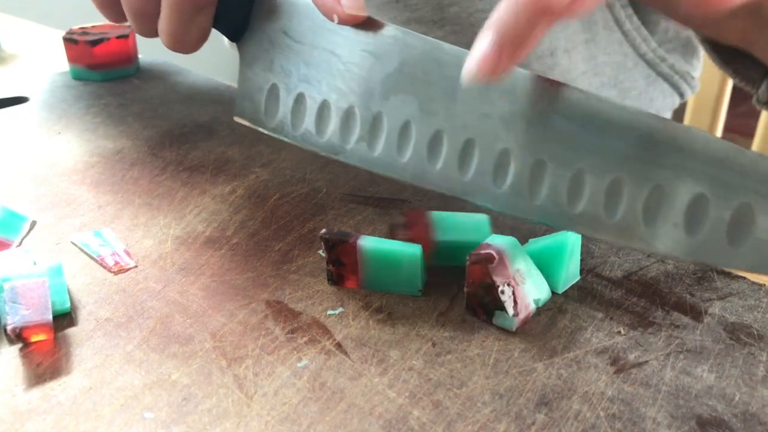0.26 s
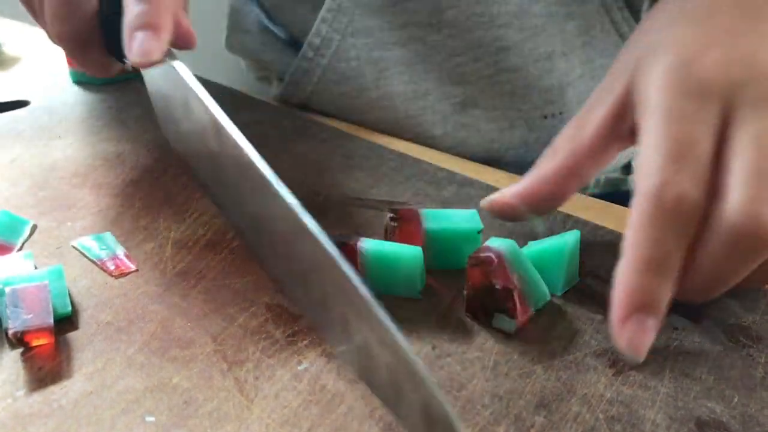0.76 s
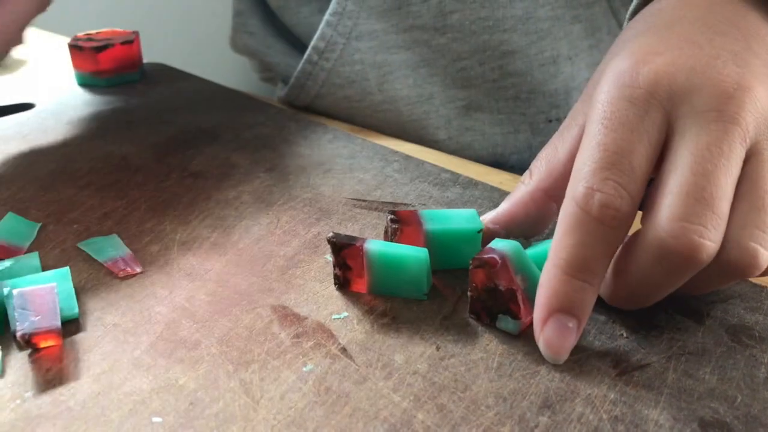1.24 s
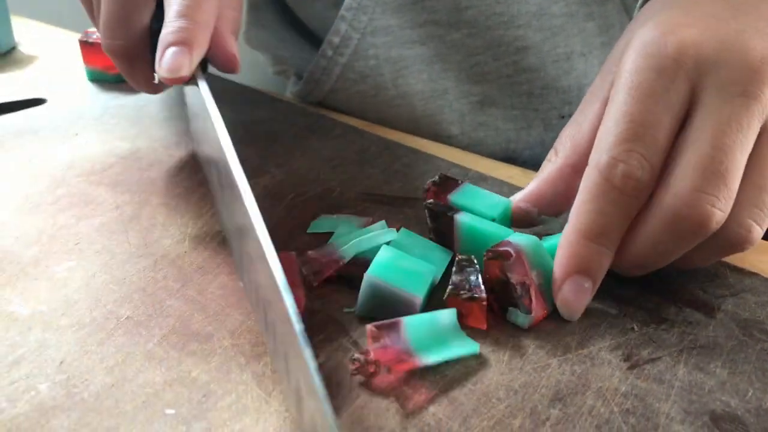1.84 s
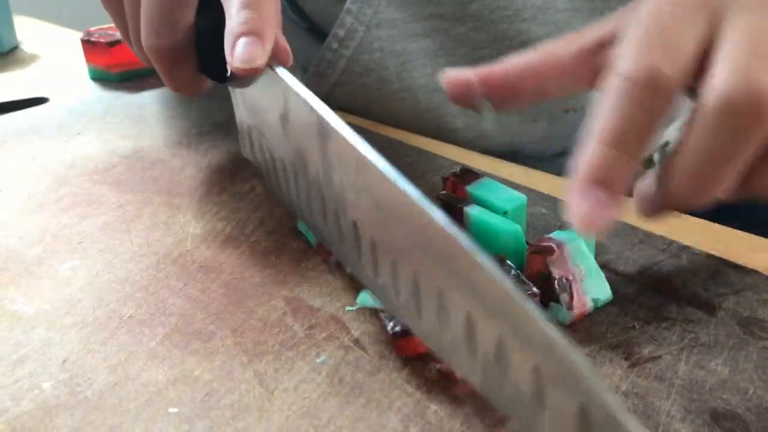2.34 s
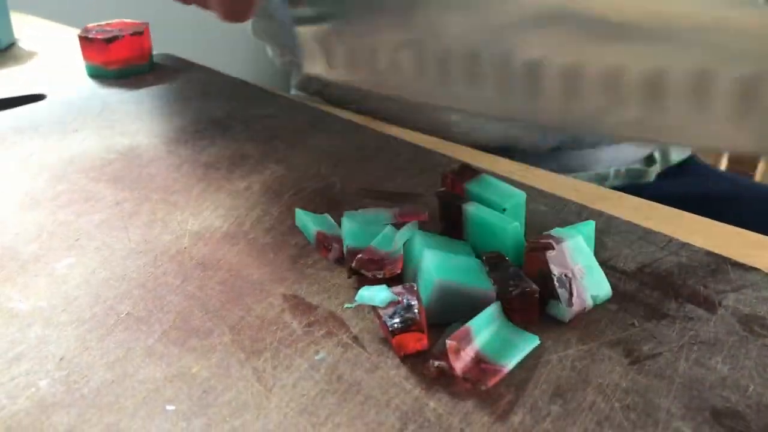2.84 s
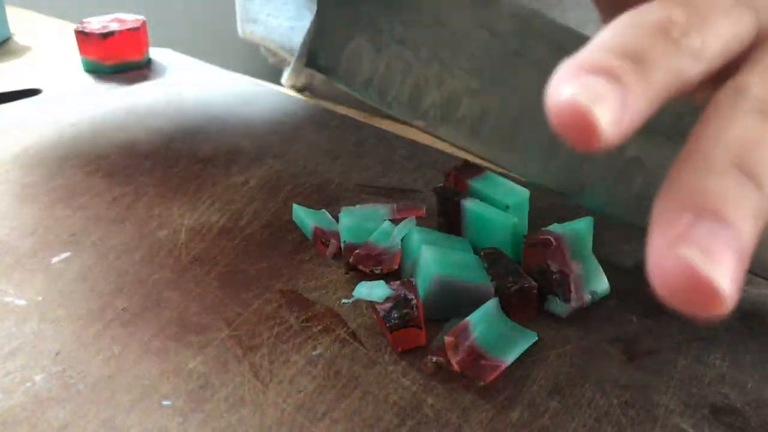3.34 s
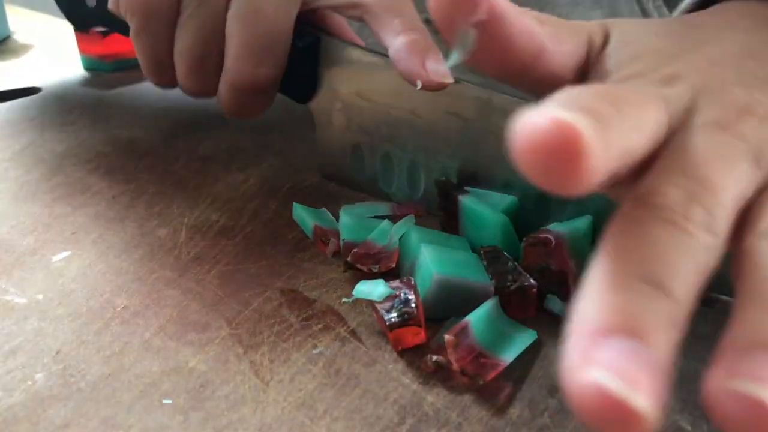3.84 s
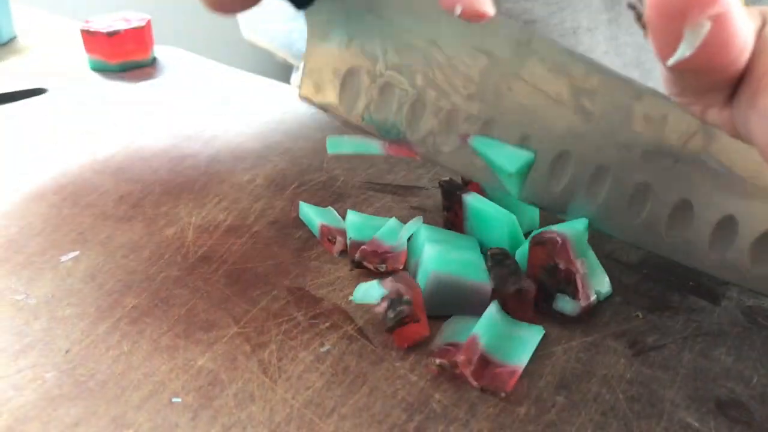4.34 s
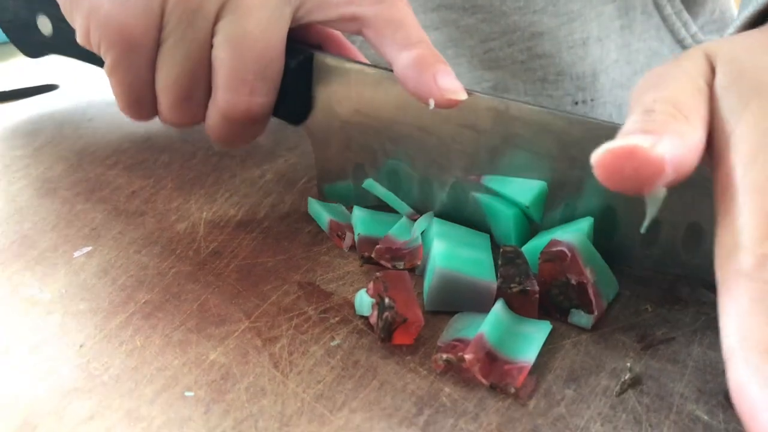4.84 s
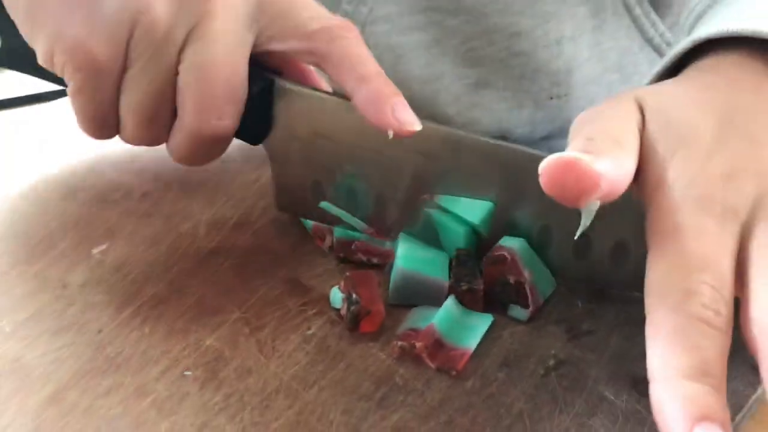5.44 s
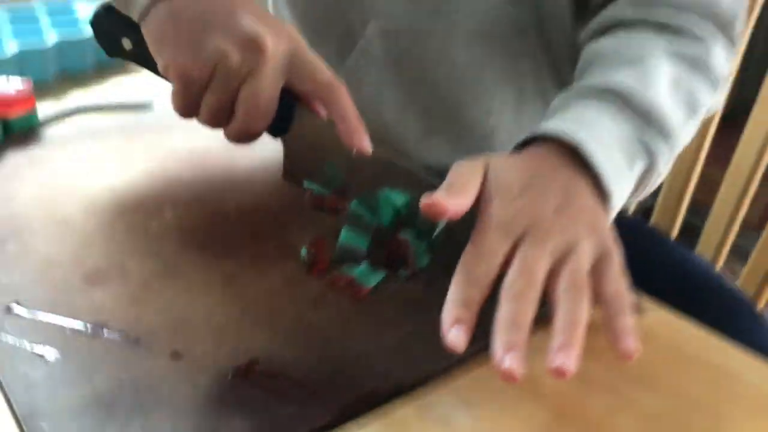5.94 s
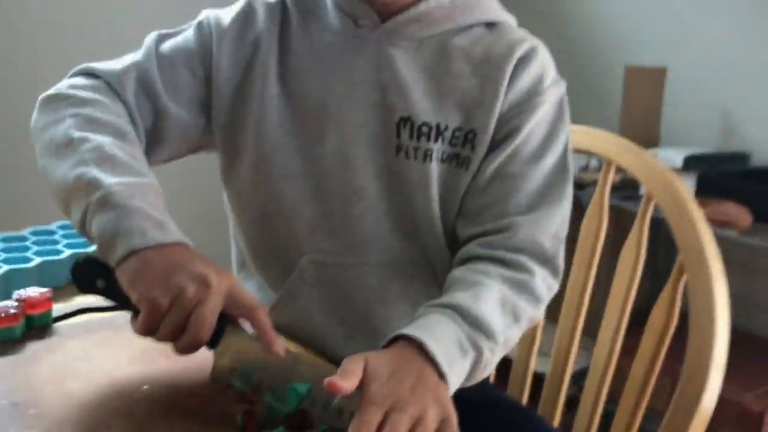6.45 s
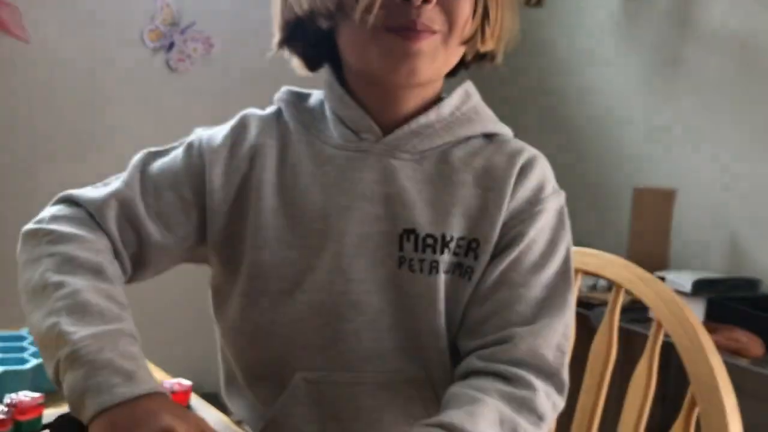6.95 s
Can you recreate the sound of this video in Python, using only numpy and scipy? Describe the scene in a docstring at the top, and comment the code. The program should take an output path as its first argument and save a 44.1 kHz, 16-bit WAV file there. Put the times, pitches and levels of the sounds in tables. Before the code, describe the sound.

Irregular knife chops crack through soap and knock on a wooden cutting board, between ringing blade scrapes and small ticks.

```python
"""Chopping soap on a wooden board

A large kitchen knife chops small blocks of soap on a board that lies on a table in a small room.
The blade breaks through with a crack and knocks the board into a woody ring. Tiny slips of the edge
rasp and make the steel ring as it scrapes the pieces across the board and slices them. Bits of soap
drop and hop, and the blade ticks and clicks, over soft sleeve brushes, handling bumps and room noise."""
import sys
import numpy as np
from scipy import signal
from scipy.fft import rfft, irfft, next_fast_len
from scipy.io import wavfile
from scipy.ndimage import uniform_filter1d, map_coordinates

SR = 44100
rng = np.random.default_rng(int(sys.argv[2]) if len(sys.argv) > 2 else 0)


def dump_mix(stems):
    """Bounce the given channels to the path in sys.argv[1] as a 16-bit WAV at rate SR."""
    frames = np.atleast_2d(stems).T  # one column per channel
    limited = np.clip(frames, -1, 1)  # hard clip at full scale
    pcm = np.round(limited * 32767).astype(np.int16)
    wavfile.write(sys.argv[1], SR, pcm)


N = 316986
TIME = np.arange(N) / SR
HIT_SIZE = 4096   # FFT size of one contact, in samples
FADE_DB = 30   # depth of a gesture's attack and release


def from_db(db):
    """Decibels to gain."""
    return 10 ** (np.asarray(db) / 20)


def rms_one(x):
    """Scale to unit rms."""
    return x / np.sqrt(np.mean(x ** 2) + 1e-20)


def bins(size):
    """Frequencies of a spectrum, kept above zero."""
    return np.maximum(np.fft.rfftfreq(size, 1 / SR), 1)


def at_hz(points, hz):
    """Read a curve on a log-frequency axis."""
    known, values = np.transpose(points)
    return np.interp(np.log(hz), np.log(known), values)


def coloured(x, spectrum):
    """Shape a steady sound with an EQ curve."""
    size = next_fast_len(len(x))
    return irfft(rfft(x, size) * from_db(at_hz(spectrum, bins(size))), size)[:len(x)]


def add(track, s, sound):
    """Mix a sound in at s seconds."""
    start = max(round(s * SR), 0)
    track[start:start + len(sound)] += sound[:max(N - start, 0)]


def swell(s, length_s):
    """A gate with soft ends."""
    gate = np.zeros(N)
    add(gate, s, signal.windows.tukey(max(int(length_s * SR), 8), .6))
    return gate


def push(s, level_db, attack_s, hold_s, release_s):
    """A gesture's envelope: it climbs FADE_DB in the attack, holds, and sinks FADE_DB per release time."""
    past_top = TIME - s - attack_s
    away = np.maximum(-past_top, 0) / attack_s + np.maximum(past_top - hold_s, 0) / release_s
    return from_db(level_db - FADE_DB * np.minimum(away, 10)) * (TIME > s)


def wander(per_s):
    """A slow random drift of unit rms."""
    knots = rng.standard_normal(2000)
    return rms_one(np.interp(TIME * per_s, np.arange(len(knots)), knots))


def resonate(x, hz, width_hz):
    """One resonance with unity gain at its peak."""
    r = np.exp(-np.pi * width_hz / SR)
    poles = [1, -2 * r * np.cos(2 * np.pi * hz / SR), r * r]
    return signal.lfilter(np.array([1, 0, -1]) * (1 - r * r) / 2, poles, x)


def impact(level_db, lag_s, bend_hz):
    """A pulse of a given spectrum; bending waves carry its treble first and its bass last."""
    hz = bins(HIT_SIZE)
    cepstrum = irfft(np.log(from_db(level_db)))
    cepstrum[1:HIT_SIZE // 2] *= 2   # fold to minimum phase for a sharp onset
    cepstrum[HIT_SIZE // 2 + 1:] = 0
    dispersion = 2 * np.pi * lag_s * bend_hz * np.arctan(hz / bend_hz)
    soft_top = np.cos(np.pi * hz / SR) ** .5
    pulse = irfft(np.exp(rfft(cepstrum) - 1j * dispersion) * soft_top)
    return np.roll(pulse, 6)[:HIT_SIZE // 2]


def scattered(pulse, share_db, decay_s):
    """The wave bounces between nearby edges for a few milliseconds, differently at every contact."""
    t = TIME[:HIT_SIZE // 4]
    echoes = rng.standard_normal(len(t)) * np.exp(-t / decay_s) * (1 - np.exp(-t / 0.0015))
    echoes *= from_db(share_db) / np.linalg.norm(echoes)
    echoes[0] = 1
    return signal.fftconvolve(pulse, echoes / np.linalg.norm(echoes))


def room_tone():
    """The low noise of still air, and a brief, faint high whine."""
    # Each row: frequency in Hz, relative level in dB.
    air_colour = [(15, -41.5), (25, -17), (49, -7.5), (114, -8.5), (145, 0), (166, -14.5), (200, -1),
                  (263, -10.5), (317, -5.5), (463, -13.5), (503, -18), (754, -18.5), (936, -24.5),
                  (12900, -39.5), (16000, -39)]
    # Each row: frequency of a partial in Hz, level in dB.
    whine_partials = [(6340, -89.5), (12680, -82.5)]
    air = from_db(-63.5) * rms_one(coloured(rng.standard_normal(N), air_colour))
    whine = sum(from_db(db) * np.sqrt(2) * np.sin(2 * np.pi * hz * TIME) for hz, db in whine_partials)
    return air + whine * (TIME > 5.94) * (TIME < 6.44)


def room_reverb(x, build_s):
    """Dense reflections build up within milliseconds and die away octave by octave."""
    # Each row: frequency in Hz, reverb level in dB.
    reverb_colour = [(40, -3.5), (120, -3.5), (300, -2), (600, -7), (1100, -4), (2200, -8.5), (4500, -11),
                     (9000, -11.5), (15000, -18)]
    # Each row: frequency in Hz, seconds to fall 60 dB.
    decay_times = [(60, 0.75), (200, 0.79), (600, 0.39), (1500, 0.56), (4000, 0.31), (9000, 0.38),
                   (15000, .18)]
    t, hz = TIME[:SR], bins(SR)
    white, tail = rfft(rng.standard_normal(SR)), 0
    for centre in np.geomspace(31.25, 16000, 10):
        octave = np.maximum(1 - np.abs(np.log2(hz / centre)), 0)
        band = irfft(white * octave * from_db(at_hz(reverb_colour, hz)), SR)
        decay = from_db(-60 * t / at_hz(decay_times, centre)) * (1 - np.exp(-(t / build_s) ** 2))
        tail = tail + band * decay / np.linalg.norm(decay)
    return signal.fftconvolve(x, tail)[:N]


def handling_rumble():
    """Soft low bumps as the table and the hand-held microphone are jostled."""
    # Each row: start in seconds, level in dB.
    jolts = [(4.66, -46.5), (5.44, -47), (5.65, -56), (6.455, -56.5), (6.735, -49), (6.87, -63.5)]
    # Each row: frequency in Hz, relative level in dB.
    rumble_colour = [(15, -30.5), (28, -14), (45, -1.5), (70, 0.5), (110, -10.5), (220, -26), (1000, -66.5)]
    shaking = sum(push(s, db, attack_s=.09, hold_s=0, release_s=.27) for s, db in jolts)
    return shaking * rms_one(coloured(rng.standard_normal(N), rumble_colour))


def sleeve_brushes():
    """Hand and sleeve rub in soft swells of midrange noise."""
    # Each row: start in seconds, length in seconds, level in dB.
    brushes = [(0.163, 0.2, -65.5), (0.338, 0.16, -70), (0.53, 0.15, -71), (2.58, .1, -77),
               (5.235, .07, -71.5), (5.4, 0.29, -70), (5.814, 0.11, -70.5), (6.066, 0.13, -70),
               (6.397, 0.055, -68.5), (6.724, 0.14, -58)]
    # Each row: frequency in Hz, relative level in dB.
    cloth_colour = [(200, -29), (900, 5.5), (1600, 6.5), (3000, 1.5), (6000, -13.5), (15000, -20)]
    cloth = rms_one(coloured(rng.standard_normal(N), cloth_colour))
    return cloth * sum(from_db(db) * swell(s, length) for s, length, db in brushes)


def blade_singing():
    """A finger wiping the steel keeps a few narrow modes of the free blade alive."""
    # Each row: frequency in Hz, relative level in dB.
    free_modes = [(4495, -18), (6519, -5), (7456, -15), (8484, -4), (9792, -10), (11203, -11)]
    # Each row: start in seconds, gain in dB.
    wipes = [(2.4, -83), (2.468, -64.5), (3.05, -80.5)]
    rub = rng.standard_normal(N)
    tones = sum(from_db(db) * rms_one(resonate(rub, hz, width_hz=22)) for hz, db in free_modes)
    return tones * sum(push(s, db, attack_s=.083, hold_s=0, release_s=.14) for s, db in wipes)


def taps(rows, skirt_db, lag_s, decay_s):
    """Small contacts: a broad hump of spectrum round each one's pitch, blurred by a short rattle."""
    track = np.zeros(N)
    for s, level_db, pitch_hz in rows:
        octaves = np.log2(bins(HIT_SIZE) / pitch_hz)
        pulse = impact(-skirt_db * np.hypot(octaves, 1), lag_s, bend_hz=1040)
        pulse /= np.abs(pulse).max()
        add(track, s, from_db(level_db) * scattered(pulse, share_db=2, decay_s=decay_s))
    return track


def blade_ticks():
    """Bright ticks and sharp clicks of the blade as it touches, cracks the soap or catches on the board."""
    # Each row: start in seconds, level in dB, pitch in Hz.
    contacts = [(0.069, -41, 3000), (0.7055, -47.5, 3650), (0.7825, -38, 3640), (2.0954, -45, 3386),
                (2.3706, -51, 1700), (2.4684, -48, 7830), (3.218, -41.5, 5870), (3.5396, -48.5, 3000),
                (3.5787, -37, 3540), (3.6768, -24.5, 5950), (4.4395, -42, 3700), (5.2478, -51, 2983),
                (5.4497, -44.5, 3300), (5.5222, -44, 2500), (5.642, -29, 8000), (6.2057, -48, 7000),
                (6.461, -44.5, 2560), (6.5185, -49.5, 2900), (7.0994, -16, 3500)]
    return taps(contacts, skirt_db=10, lag_s=0.0011, decay_s=0.0018)


def soap_drops():
    """Each piece drops or tips over, hops once and lands again more softly."""
    # Each row: start in seconds, relative level in dB, pitch in Hz.
    landings = [(0.067, -40, 610), (0.264, -43, 594), (0.952, -48, 720), (2.094, -33.5, 610),
                (2.371, -43, 973), (3.297, -48, 900), (3.966, -46, 641), (4.44, -47, 1000),
                (5.424, -45, 1050), (5.902, -43.5, 1010), (6.132, -39, 680)]
    hop_loss_db = 14.5
    hops = [(s + 0.033 * rng.uniform(0.95, 0.98), db - hop_loss_db, hz) for s, db, hz in landings]
    return from_db(-1.5) * taps(landings + hops, skirt_db=23, lag_s=0.0026, decay_s=0.0043)


def blade_ring(slips, shift_db, flex_s):
    """The contact travels along the edge, so modes swell and fade; flexing bends their pitch a little."""
    # Each row: frequency in Hz, bandwidth in Hz, relative level in dB.
    steel_modes = [(775, 36, 1), (1070, 44, -6), (1530, 87, -8), (1960, 39, -6), (2630, 34, 0),
                   (2940, 59, -3), (3290, 22, -10), (3520, 43, -9), (3730, 200, -6), (4190, 89, -11),
                   (4460, 86, -9), (5580, 84, -9), (6170, 65, -10), (6520, 33, -5), (6800, 37, -11),
                   (7560, 100, -14), (8090, 55, -9), (8580, 50, -10), (9200, 96, -4), (9750, 27, -10),
                   (10400, 48, -8), (11200, 26, -12), (11500, 40, -3), (12700, 49, -2), (12900, 32, -2),
                   (14000, 74, -13), (14300, 100, -18), (15100, 81, -16)]
    ring = sum((-1) ** k * from_db(db + shift_db * wander(per_s=20)) * resonate(slips, hz, width)
               for k, (hz, width, db) in enumerate(steel_modes))
    flexed_time = TIME + flex_s * wander(per_s=15)
    return rms_one(map_coordinates(ring, [flexed_time * SR], order=3))


def tilted(x, db_per_octave):
    """Tip bass and treble against one another, each taken as two octaves from the middle."""
    bass = signal.sosfiltfilt(signal.butter(2, 1500, fs=SR, output="sos"), x)
    treble = signal.sosfiltfilt(signal.butter(2, 7000, "high", fs=SR, output="sos"), x)
    middle = x - bass - treble
    lift = from_db(2 * db_per_octave)
    return (bass / lift + middle + treble * lift) / np.sqrt((1 + lift ** 2) / 2)


def blade_scrapes(slips_per_s, spread_db, judder_db):
    """Dense tiny slips of the edge rasp and excite the blade as it drags on wood or slices soap."""
    # Drags across the board. Each row: start in seconds, level in dB, attack, hold and release
    # in seconds, steel ring in dB, bite into the wood in dB.
    drags = [(1.202, -29.7, .085, .065, .22, 2.5, -20), (1.402, -46, .212, 0.0071, 0.039, -7, -14),
             (7.08, -32, .021, .018, .2, -2, 5)]
    # Short slides through soap. Each row: start and length in seconds, level in dB,
    # brightness in dB per octave, steel ring in dB.
    slices = [(0.033, .03, -56.5, 7, 0), (0.855, 0.061, -59, 1.5, -8), (1.937, .08, -49, 5, 1),
              (2.111, 0.083, -58.5, 2.5, -3), (3.575, 0.021, -55, 0, -12), (3.664, 0.018, -42.5, -.5, -7),
              (4.038, .22, -69, 3, -9), (4.434, .058, -59.5, -1, -8), (6.439, 0.16, -65, -4.5, -14)]
    # Dry friction between the resonances. Each row: frequency in Hz, relative level in dB.
    friction_colour = [(30, -40), (70, -18.5), (140, 1.5), (300, -2.5), (480, -3), (1000, -1), (1500, -1),
                       (2800, -0.5), (5000, -6), (7000, -4), (9500, -11.5), (12500, -7.5), (16000, -14)]
    slips = (rng.random(N) < slips_per_s / SR) * rng.choice([-1, 1], N)
    slips = slips * from_db(spread_db * np.minimum(rng.exponential(1, N), 3))
    judder = rms_one(uniform_filter1d(rng.standard_normal(N), size=130))
    slips *= from_db(judder_db * judder)
    force, ring, bite = np.zeros((3, N))
    for *gesture, ring_db, bite_db in drags:
        stroke = push(*gesture)
        leading = stroke > force
        ring[leading], bite[leading] = from_db(ring_db), from_db(bite_db)
        force += stroke
    # hard pressure makes the steel ring brightly, a light drag is duller and mostly dry
    pressure = np.maximum(force / force.max(), from_db(-2 * FADE_DB))
    brightest_tilt, dulling_per_db = .8, .05   # dB per octave
    tilt = brightest_tilt + dulling_per_db * 20 * np.log10(pressure)
    ring *= pressure ** .25
    # soap gripping the blade damps its ring
    for s, length, db, brightness, ring_db in slices:
        gate = swell(s, length)
        force += from_db(db) * gate
        tilt[gate > 0], ring[gate > 0], bite[gate > 0] = brightness, from_db(ring_db), 0
    steel = blade_ring(slips, shift_db=4.0, flex_s=.00005)
    wood = rms_one(resonate(slips, hz=3400, width_hz=2400))   # the bite gathers in one broad band
    friction = rms_one(coloured(slips, friction_colour))
    rasp = (friction + ring * steel + bite * wood) / np.sqrt(1 + ring ** 2 + bite ** 2)
    return force * tilted(rasp, tilt)


def board_ring(drive):
    """The modes of board and table ring on after each contact."""
    # Each row: frequency in Hz, relative level in dB, seconds to fall 60 dB.
    wood_modes = [(60, -53.5, 0.54), (83.5, -46, 0.24), (115.5, -47, .3), (188.2, -44.5, .4),
                  (259.6, -42.5, 0.42), (284, -42, 0.27), (377.2, -40.5, 0.3), (517.2, -43, 0.071),
                  (609, -42.5, 0.2), (643.5, -46, 0.44), (740, -44, 0.071), (1068, -43.5, 0.23),
                  (2230, -45.5, 0.098)]
    t = TIME[:SR // 2]
    ring = sum((-1) ** k * from_db(db - 60 * t / t60) * np.sin(2 * np.pi * hz * t)
               for k, (hz, db, t60) in enumerate(wood_modes))
    onset = 1 - np.exp(-t / 0.0058)
    return signal.fftconvolve(drive, ring * onset)[:N] * from_db(-8)


def blow(level_db, tone_hz, tone_db):
    """One contact with the board, with the woody tone of the spot that is struck."""
    # The EQ all blows share. Each row: frequency in Hz, gain in dB.
    blow_colour = [(25, -33), (60, -7), (120, 3), (300, 2), (550, 2.5), (1100, 1.5), (1600, -1),
                   (2300, 1.5), (3000, -1), (4400, 0.5), (7000, -3.5), (9500, -3.5), (13000, -10),
                   (16000, -22)]
    hz = bins(HIT_SIZE)
    tone = tone_db / np.hypot(1, 11 * (hz / tone_hz - tone_hz / hz))
    return impact(level_db + at_hz(blow_colour, hz) + tone, lag_s=0.0037, bend_hz=690)


def hand_thuds():
    """Hand and knife heel bump board and table: the direct sound, and the drive for board and room."""
    # Each row: start in seconds, strength in dB, woody tone in Hz.
    bumps = [(2.0949, -9, 628), (3.563, -8.5, 290.6), (3.583, -4.5, 99), (5.495, -4.5, 101),
             (5.524, -8, 77), (6.759, 1, 186), (6.805, -9, 61)]
    # A soft, dull contact. Each row: frequency in Hz, gain in dB.
    soft_colour = [(150, 0), (900, -16.5), (2200, -20.5), (9000, -36)]
    direct, drive = np.zeros((2, N))
    for s, strength_db, tone_hz in bumps:
        pulse = blow(strength_db + at_hz(soft_colour, bins(HIT_SIZE)), tone_hz, tone_db=10)
        add(direct, s, scattered(pulse, share_db=-1, decay_s=0.0026))
        add(drive, s, pulse * from_db(-0.5))
    return direct, drive


def knife_chops():
    """The blade cracks the soap and knocks the wood: the direct sound, and the drive for board and room."""
    # Each row: start in seconds, strength in dB, contact cut-off in Hz (higher for a harder contact),
    # bass weight in dB, crack in dB, woody tone in Hz, its boost in dB.
    chops = [(1.2023, 8, 3100, 6, -17, 693, 12), (1.9413, 13.5, 3400, 2, -15, 570, 0.5),
             (3.2194, -4, 640, 10, -23, 698, 11), (3.6555, 2.5, 2150, 2.5, -26, 830, 5),
             (4.7004, 18.7, 1800, -5.5, -10, 520, 8), (5.643, -1.5, 1250, 13, -16, 1105, 6.5),
             (6.7372, -1.5, 2000, 12, -38, 1023, 9), (7.0213, 5.5, 2300, -10, -44, 757, 10),
             (7.106, -2.5, 6000, -18, -8, 665, 9)]
    weight_below_hz, crack_fade_hz, contact_slope = 340, 5500, 5.6
    pinning = 0.2   # a hard blow pins the board: dB of ring lost per dB of strength
    direct, drive = np.zeros((2, N))
    hz = bins(HIT_SIZE)
    for s, strength_db, contact_hz, weight_db, crack_db, tone_hz, tone_db in chops:
        knock_power = 1 / (1 + (hz / contact_hz) ** contact_slope)
        crack_power = from_db(crack_db) ** 2 / (1 + (hz / crack_fade_hz) ** 2)
        contact_db = 10 * np.log10(knock_power + crack_power)
        bass_db = weight_db / (1 + (hz / weight_below_hz) ** 2)
        pulse = blow(strength_db + contact_db + bass_db, tone_hz, tone_db)
        add(direct, s, scattered(pulse, share_db=-2, decay_s=0.00098))
        add(drive, s, pulse * from_db(-0.5 - pinning * strength_db))
    return direct, drive


def scene():
    """Knife, soap and board close by, with the room round them, in mono."""
    chops, chop_drive = knife_chops()
    thuds, thud_drive = hand_thuds()
    drops = soap_drops()
    ticks = blade_ticks()
    scrapes = blade_scrapes(slips_per_s=6000, spread_db=3.0, judder_db=2.0)
    drive = chop_drive + thud_drive + drops
    board = board_ring(drive + from_db(-4.5) * scrapes)
    near = chops + thuds + drops + ticks + scrapes + board + blade_singing() + sleeve_brushes()
    reverb = room_reverb(drive + ticks + from_db(-1.0) * scrapes, build_s=0.0036)
    return (near + reverb + handling_rumble() + room_tone())[None]


def record(dry):
    """A steep low-pass takes off the very top."""
    cutoff_hz = 15950
    return signal.sosfilt(signal.ellip(10, .1, 70, cutoff_hz, fs=SR, output="sos"), dry)


dry = scene()
out = record(dry)
dump_mix(out)
```